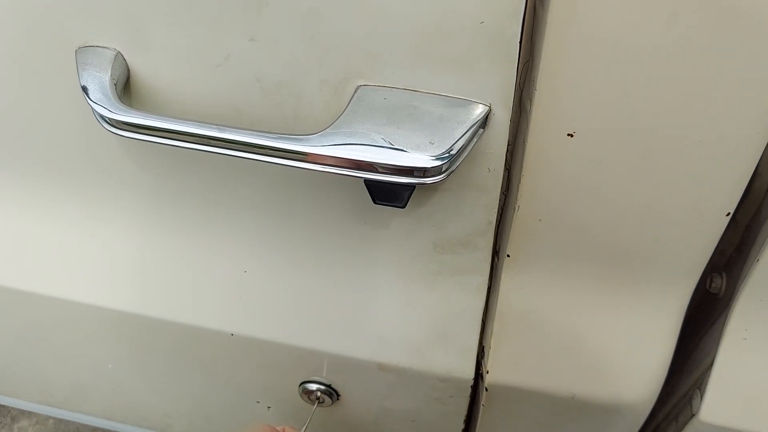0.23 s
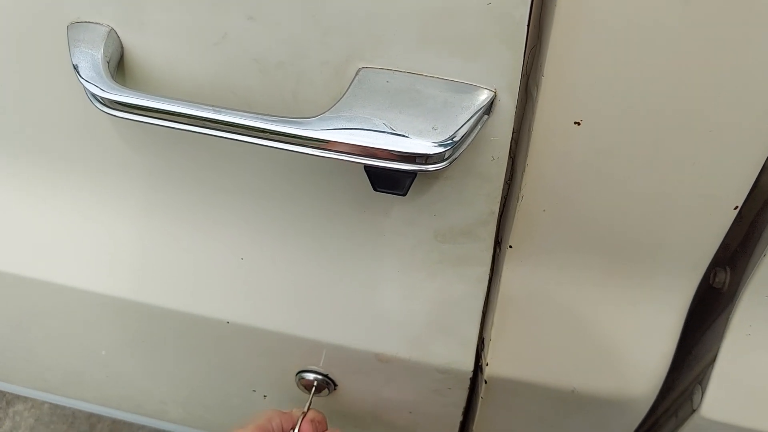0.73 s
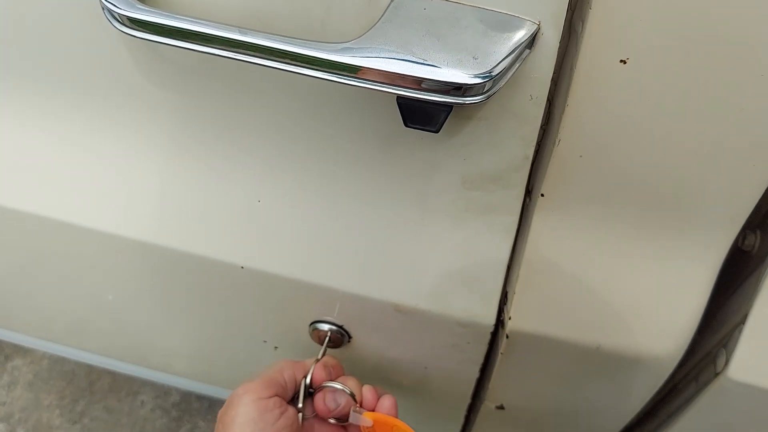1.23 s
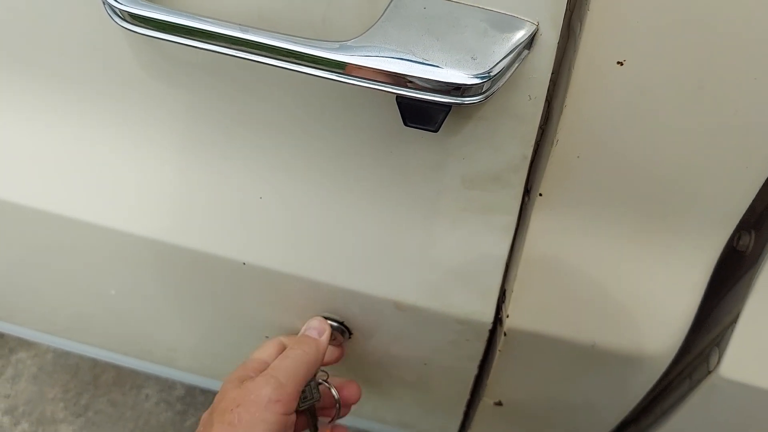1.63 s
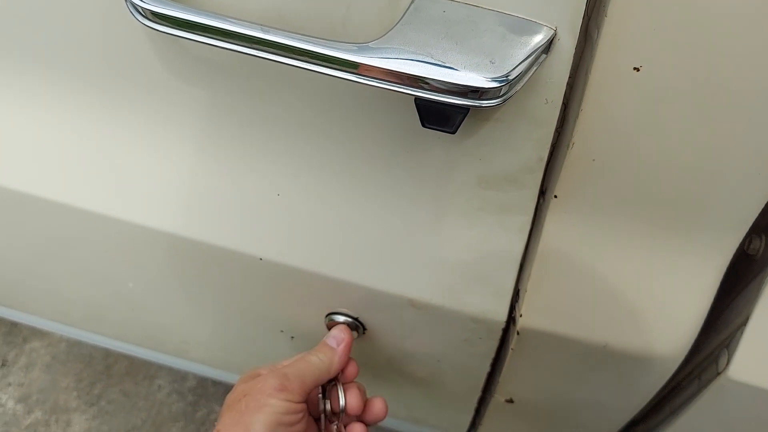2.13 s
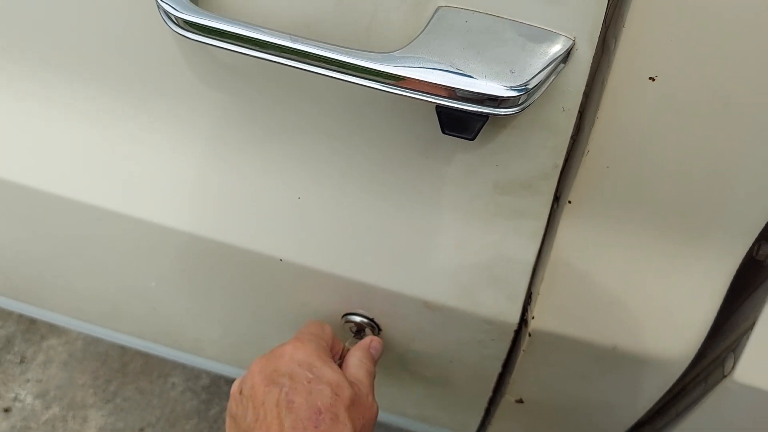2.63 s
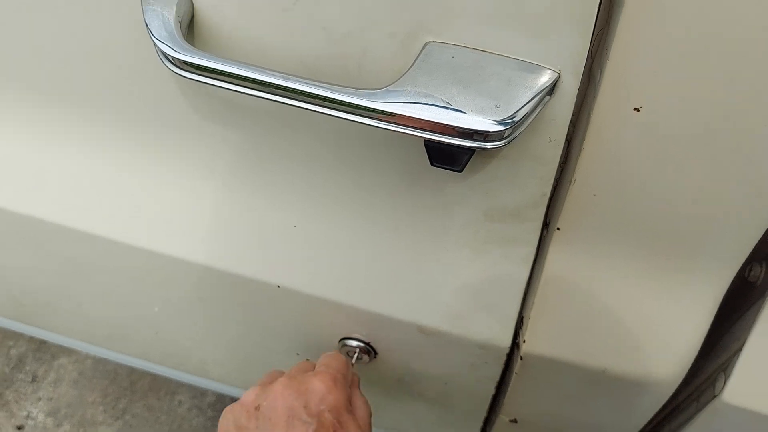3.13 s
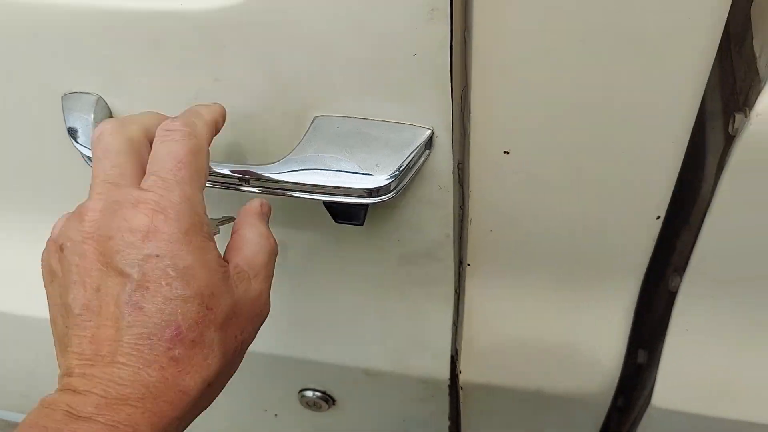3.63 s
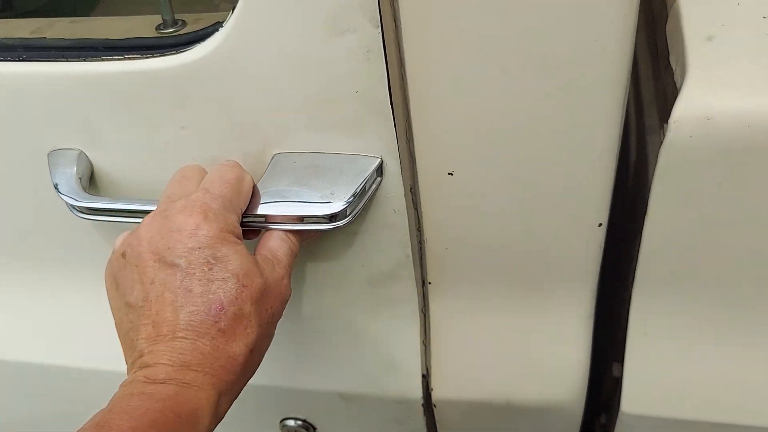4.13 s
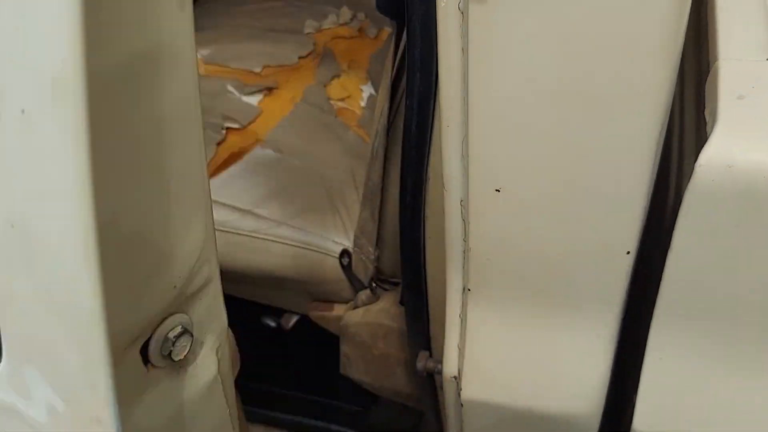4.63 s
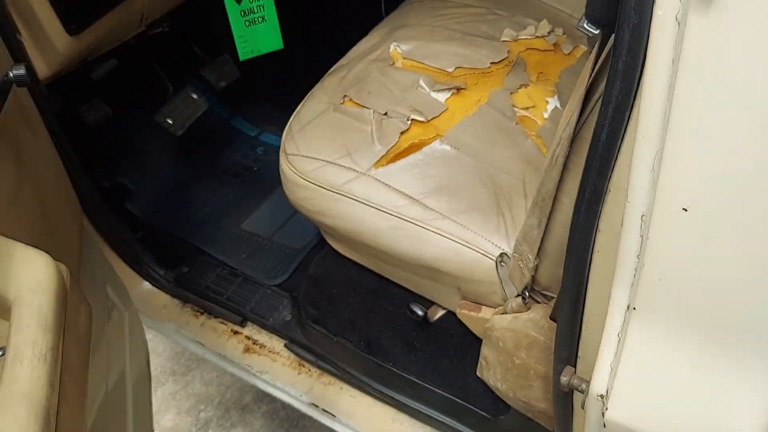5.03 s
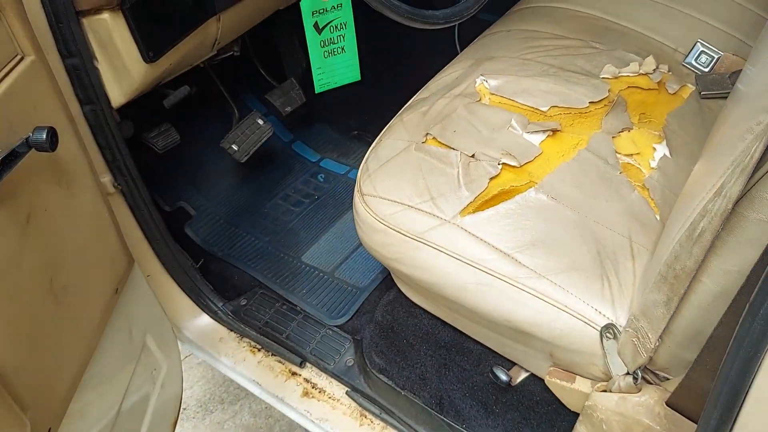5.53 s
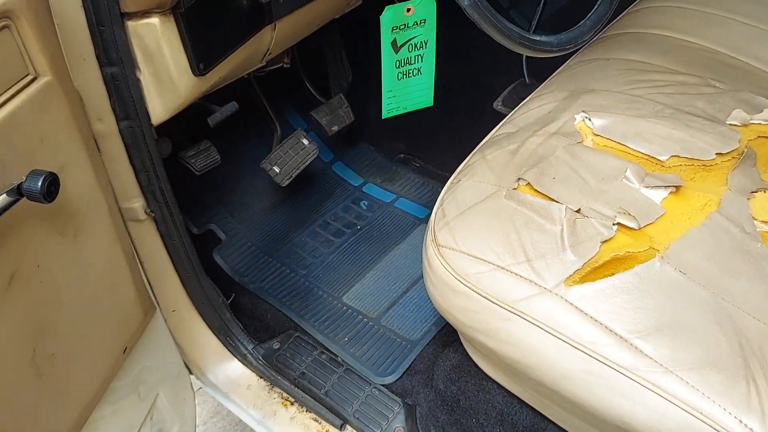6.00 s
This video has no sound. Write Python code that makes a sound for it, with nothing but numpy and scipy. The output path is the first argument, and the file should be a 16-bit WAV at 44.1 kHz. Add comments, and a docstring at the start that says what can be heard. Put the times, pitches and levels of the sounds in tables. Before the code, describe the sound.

Close outdoors, a key rasps and clacks in a vehicle's door lock, slides out, and the button and latch squeak and rattle as the door opens.

```python
"""Outdoors, close to an old truck's steel door: a key finds the lock, slides over the pins, turns, throws the bolt
and is pulled out; the key bunch clinks, the handle button squeaks in, the latch lets go, the door swings open.
Blows and sliding excite the hollow door's modes; keys, lock and latch ring in modes of their own.
Damped knocks and low puffs of air on the microphone are short tones with noise, squeaks are gliding
stick-slip tones, and shaped noise makes the faint background."""
import sys
import numpy as np
from scipy import signal
from scipy.fft import rfft, irfft, next_fast_len
from scipy.io import wavfile
from scipy.ndimage import map_coordinates

SR = 44100
rng = np.random.default_rng(int(sys.argv[2]) if len(sys.argv) > 2 else 0)


def store_wav(level_fs):
    """Save 16-bit WAV to argv[1]."""
    pcm = np.round(np.clip(np.atleast_2d(level_fs), -1, 1) * 32767)
    wavfile.write(sys.argv[1], SR, pcm.T.astype(np.int16))


N = 276242  # length in samples
T = np.arange(SR // 2) / SR  # time axis of one event (s)
KEY_OUT_S, DOOR_OPEN_S = 3.35, 4.8
FLEX_CUT_HZ, FLEX_HZ, BOOM_HZ, TICK_HZ = 135, 250, 800, 5000  # edges of the door's registers


def amp(db):
    """Logarithmic level: decibels to amplitude gain."""
    return 10 ** (np.asarray(db) / 20)


def unit(x):
    """Power normalisation: scale to rms 1."""
    return x / np.sqrt(np.mean(x ** 2) + 1e-20)


def struck(x, size=1400):
    """Onset normalisation: scale a decaying sound to rms 1 over its first samples."""
    return x / np.sqrt(np.mean(x[..., :size] ** 2) + 1e-20)


def along(points, hz):
    """Logarithmic frequency scale: interpolate (f, value) points along it."""
    f, v = np.transpose(points)
    return np.interp(np.log(hz + 1), np.log(f + 1), v)


def fade(t60):
    """Exponential damping: a fall of 60 dB in t60 seconds."""
    return np.exp(-np.log(1000) * T / t60)


def build(rise_s):
    """Exponential build-up of a driven response, with time constant rise_s."""
    return 1 - np.exp(-T / rise_s)


def panned(x, pan_db):
    """Interaural level difference: lean a sound to the left by pan_db."""
    return x * amp([[pan_db / 2], [-pan_db / 2]])


def add(track, s, x):
    """Superposition: mix x into the track at s seconds."""
    part = track[:, max(round(s * SR), 0):][:, :x.shape[-1]]
    part += x[..., :part.shape[1]]


def band(x, hz, kind, order=3):
    """Causal Butterworth filtering."""
    edges = np.clip(hz, 10, SR / 2 - 100)
    return signal.sosfilt(signal.butter(order, edges, kind, fs=SR, output="sos"), x)


# Interaural coherence of noise and modes: f/Hz, left-right likeness (0-1)
ALIKE = [(50, 0.57), (130, 0.96), (300, 0.95), (640, 0.7), (1400, 0.084), (3100, 0), (7000, 0)]


def half_angle(hz):
    """Interaural coherence as an angle: the cosine of twice this angle is the left-right likeness."""
    return np.arccos(np.clip(along(ALIKE, hz), -1, 1)) / 2


def noise(spectrum, size):
    """Spectral shaping of random noise; mid and side are weighted for the coherence at each frequency."""
    m = next_fast_len(size)
    hz = np.fft.rfftfreq(m, 1 / SR)
    turn = half_angle(hz)
    shape = amp(along(spectrum, hz)) * [np.cos(turn), np.sin(turn)]
    mid, side = irfft(rfft(rng.standard_normal((2, m))) * shape, m)[:, :size]
    return unit(np.array([mid + side, mid - side]))


def ring(modes, scatter_db):
    """Modal superposition: decaying sines at new strengths, with phase split between the ears by coherence."""
    out = np.zeros((2, len(T)))
    for hz, db, t60 in modes:
        size, phase = amp(db + scatter_db * rng.normal()), rng.uniform(0, 2 * np.pi)
        split = rng.choice([-1, 1]) * half_angle(hz)
        angle = (2 * np.pi * hz * T + phase + np.array([[split], [-split]])).astype(np.float32)
        out += size * fade(t60) * np.sin(angle)
    return out


def wobble(rate):
    """Random modulation: a smooth curve through rate random knots a second."""
    knots = rng.standard_normal(int(N * rate / SR) + 4)
    return map_coordinates(knots, [np.arange(N) * rate / SR])


def registers(x):
    """Band decomposition into deep flex, low boom, middle clack and high shimmer of the door."""
    flex, boom = band(x, FLEX_HZ, "low", order=5), band(x, [FLEX_HZ, BOOM_HZ], "band", order=5)
    return flex, boom, band(x, [BOOM_HZ, TICK_HZ], "band"), band(x, TICK_HZ, "high")


# The door's strong panel modes, with the latch's ring near 381 Hz sounding along: f/Hz, relative level/dB,
# t60/s
PANEL = [(132.3, -3.5, 0.68), (149.3, 6, 0.28), (190.6, 2, 0.74), (248, -4, 0.24), (260.8, -0.5, 0.4),
         (286, 2, 0.11), (315.3, 0, 0.42), (352.2, -4.5, 0.55), (381, -3, 0.44), (423.7, 6, 0.18),
         (453.7, 5, 0.3), (484.8, 2.5, 0.33), (505.6, 3, 0.37), (544, 2, 0.33), (563.7, 6, 0.24),
         (591.6, 0.5, 0.49), (629.5, 1, 0.42), (689, 0.5, 0.27), (735, 0.5, 0.33), (1026, -10, 0.25),
         (1244, -0.5, 0.27), (1383, 3, 0.23), (1502, 2.5, 0.19), (1653, -5, 0.14), (1770, -2, 0.17),
         (1904, -10, 0.38), (2030, -7, 0.15), (2150, -5.5, 0.22), (2317, -2.5, 0.15), (2560, -8, 0.14),
         (2766, -5, 0.16)]
# Its dense weak modes: f/Hz, relative level/dB
SHELL = [(60, -25), (95, 0), (135, 3.5), (300, -5), (520, 1.5), (730, -4), (900, -6.5), (1300, -5),
         (1800, -4), (2600, -8.5), (4500, -8.5), (6200, -19), (10000, -24.5), (15000, -22.5)]
# Damping of the dense modes: f/Hz, t60/s
SHELL_DECAY = [(100, 0.22), (600, 0.58), (1800, 0.26), (4800, 0.12), (12000, 0.1)]


def door(modes_db=2):
    """Modal density: the hollow door's impulse response has strong panel modes among many weak ones."""
    hz, t, z = signal.stft(noise(SHELL, len(T)), SR, nperseg=256)
    decay = np.exp(-np.log(1000) * t / along(SHELL_DECAY, hz)[:, None])
    dense = signal.istft(z * decay, SR, nperseg=256)[1][:, :len(T)]
    return struck(dense) + amp(modes_db) * struck(ring(PANEL, scatter_db=4.5))


# Colour of the outdoor background: f/Hz, relative spectral density/dB per Hz
AIR = [(20, -40), (37, -15), (59, -4), (114, -10), (166, -20.5), (420, -15), (560, -16), (700, -22.5),
       (988, -27), (1350, -23.5), (1530, -19), (1800, -22), (2410, -26.5), (4250, -30), (16000, -42.5)]
# Its common rise and fall, before the rumble's boost: t/s, level/dB
AIR_LEVEL = [(0.0, -62.5), (0.45, -57), (1.1, -58.5), (2.698, -57), (3.75, -63), (4.3, -51), (4.9, -57),
             (5.85, -60), (6.26, -61.5)]


def outdoors(rumble_db=6.0):
    """Amplitude-modulated broadband noise: far rumble and thin hiss of open air rise and fall together."""
    level = amp(np.interp(np.arange(N) / SR, *np.transpose(AIR_LEVEL)))
    air = noise(AIR, N)
    rumble, hiss = band(air, 1040, "low"), band(air, 770, "high")
    return level * (panned(amp(rumble_db) * unit(rumble), 2.0) + unit(hiss))


# Knocks on small damped parts: t/s, level/dB, f/Hz, t60/s, noise over tone/dB
TAPS = [(0.1251, -40, 630, 0.054, -18), (0.141, -40.5, 559, 0.2, -7), (0.204, -35.5, 302, 0.22, -6),
        (1.721, -39, 2380, 0.014, 18), (1.797, -37.5, 579, 0.14, -8), (1.243, -36.5, 696, 0.091, -10),
        (1.411, -34.5, 333, 0.091, -8), (1.436, -39, 480, .08, -6), (1.473, -43, 697, 0.051, -13),
        (1.496, -45.5, 383, .08, -9), (1.526, -43, 324, .09, -3), (1.753, -39, 707, .08, -2),
        (1.818, -40.5, 517, 0.081, -9), (2.926, -28.5, 184.7, 0.21, -4.5), (2.957, -29.5, 496, 0.12, -13),
        (3.018, -36, 489, 0.069, -15), (4.352, -40, 511, 0.05, -6), (2.301, -32, 1250, 0.022, 4),
        (2.911, -22, 1740, 0.02, 10), (3.827, -43.5, 2570, 0.01, 14), (3.868, -59.5, 3800, 0.0087, 8),
        (4.0927, -46, 11960, 0.031, 2), (4.431, -38, 375.5, 0.12, -19), (4.688, -36.5, 480, 0.027, -4),
        (4.6952, -39.5, 4050, 0.0064, 3.5), (4.949, -57, 318.8, 0.11, 2), (5.018, -36, 466, 0.12, -6.5),
        (5.176, -43, 348, 0.15, -10), (5.178, -45, 524, 0.084, -9), (6.107, -48, 310, 0.12, -1.5),
        (6.197, -71, 1100, 0.046, 5), (6.212, -58, 1080, 0.055, 14)]


def taps(edge_db=-21):
    """Heavily damped resonance: a few cycles of one pitch, clean or noisy, under a tiny bright edge."""
    out = np.zeros((2, N))
    for s, db, hz, t60, noisy_db in TAPS:
        colour = [(hz / 4, -40), (hz / 2, -14), (hz / np.sqrt(2), -2), (hz * 1.22, -2), (hz * 2, -18), (hz * 4, -32)]
        tap = unit(np.sin(2 * np.pi * hz * T)) + amp(noisy_db) * noise(colour, len(T))
        body = struck(tap * fade(t60) * build(0.0034))
        edge = band(rng.standard_normal((2, len(T))) * fade(0.0042), [hz, hz * 3], "band", order=2)
        add(out, s, amp(db) * panned(body + amp(edge_db) * struck(edge), 0.47))
    return out


# Bare metal contact: f/Hz, relative level/dB
CRACK = [(200, -20), (900, 9), (1800, 9.5), (3500, -0.5), (6000, -14.5), (10000, -19.5), (15000, -14.5)]
# Blows that ring the door: t/s, boom level/dB, hardness (clack over boom)/dB, edge (tick over boom)/dB.
# The key tip finds the slot, goes in, seats and turns; the linkage takes up, the bolt is thrown;
# the key comes out, the button is pressed, the latch lets go, the hinges take the weight.
# Clack and tick levels come before their fixed trims.
BLOWS = [(0.1255, -44, -7.5, -4.5), (0.1825, -45, -7, 5), (0.652, -48, 2.5, 6.5),
         (1.1975, -34.5, -5.5, -12), (1.2135, -38.5, 3.5, -2.5), (1.364, -35, -4, -15),
         (1.3825, -32.5, -2.5, -10), (1.427, -43.5, -11, -1.5), (1.6045, -39, -8, -15),
         (1.9705, -39, 3.5, 3.5), (2.094, -43, -4, -20), (2.2795, -41, 4.5, -7), (2.301, -34.5, 0, -33),
         (2.726, -45.5, -6, -26), (2.7485, -35.5, 9.5, -4), (2.9065, -29, 5, -7), (2.911, -25.5, 7, 0),
         (3.1205, -44.5, 4.5, -1.5), (3.1645, -45, 8, 6.5), (3.283, -39, 6.5, -1), (3.29, -42, 8.5, 4),
         (3.31, -40, -9, -6), (4.0125, -42.5, 5, -12), (4.04, -39.5, 7.5, -2.5), (4.086, -37.5, 4.5, -11),
         (4.4135, -35.5, 4.5, -5), (4.4245, -39, 10.5, 6.5), (4.433, -47, 5.5, 1), (4.518, -35.5, 6, -20),
         (5.0185, -43, -1, -31), (5.176, -39, -8.5, -33), (5.471, -59.5, 10.5, 2.5)]
# Light ticks of pins and springs with a faint ring of the door: t/s, tick level/dB before its trim
TICKS = [(0.133, -61), (0.25, -47.5), (0.51, -58), (0.634, -49), (0.812, -57.5), (1.349, -51), (1.356, -47),
         (1.95, -42), (3.099, -55.5), (3.154, -59), (4.118, -43), (4.576, -51), (4.623, -57), (4.743, -63),
         (5.059, -54), (5.228, -57), (5.243, -51.5), (5.36, -53.5), (5.388, -54), (6.135, -53),
         (6.177, -58.5), (6.197, -51)]
TICK_EDGE_DB = 4  # a light tick's level over the door's boom, before trim
FLEX_DB, FLEX_PER_HARDNESS = -14.5, 0.11  # deep flex under the boom, a little more for hard blows
CRACK_DB, CRACK_PER_HARDNESS = -8, 0.12  # bare crack under the clack; hard blows crack more


def contacts(crack_t60=0.012, tick_t60=0.014, flex_rise_s=0.0025, boom_rise_s=0.0013,
             shimmer_db=-6, shimmer_rise_s=0.0022, open_hz=540, count=8):
    """Impact excitation: a short crack, then boom and flex build as the blow spreads through sheet steel."""
    out = np.zeros((2, N))
    answers = [registers(door()) for _ in range(count)]  # used in turn
    light = [(s, db - TICK_EDGE_DB, 0, TICK_EDGE_DB) for s, db in TICKS]
    size = len(T) // 10
    for k, (s, boom_db, hardness_db, edge_db) in enumerate(BLOWS + light):
        clack_db, tick_db = boom_db + hardness_db, boom_db + edge_db
        flex_db = boom_db + FLEX_DB + FLEX_PER_HARDNESS * hardness_db
        crack_db = clack_db + CRACK_DB + CRACK_PER_HARDNESS * hardness_db
        flex, boom, clack, shimmer = answers[k % count]
        if s > DOOR_OPEN_S:
            boom = band(boom, open_hz, "low", order=6)  # shaken only through its hinges, more dully

        bare = noise(CRACK, size) * build(0.003)[:size]
        crack = band(bare * fade(crack_t60)[:size], [BOOM_HZ, TICK_HZ], "band")
        tick = band(bare * fade(tick_t60)[:size], TICK_HZ, "high")
        add(out, s, panned(amp(crack_db) * struck(crack), -5.5) + amp(tick_db - 4) * struck(tick))

        body = amp(flex_db) * struck(band(flex, FLEX_CUT_HZ, "high") * build(flex_rise_s))
        body += panned(amp(boom_db) * struck(boom * build(boom_rise_s)), -1.0)
        body += panned(amp(clack_db - 4.0) * struck(clack * build(0.0022)), -5.0)
        body += amp(tick_db + shimmer_db) * struck(shimmer * build(shimmer_rise_s))
        add(out, s, body)
    return out


def slips(rate, spread_db):
    """Poisson-like excitation: random tiny slips of uneven size; the denser, the smaller."""
    happens = rng.random(N) < rate / SR
    unevenness = amp(spread_db * np.minimum(rng.exponential(size=N), 2))
    return happens * rng.standard_normal(N) * unevenness / np.sqrt(rate)


# Strokes of metal sliding on metal: start t/s, push t/s, release t/s, boom level/dB,
# flex over boom/dB, rasp over boom/dB, grit over boom/dB.
# A few strokes are already dying away at their push.
# The key feels for the slot, enters, rides over the pins, seats and turns, turns on and back, is drawn out;
# button and handle move, the door leaves its seal, the hinges turn.
STROKES = [(0.16, 0.228, 0.31, -37.5, -0.5, -11.5, -23), (0.32, 0.402, 0.49, -48, -19, -7, -5.5),
           (0.65, 0.694, 0.77, -40.5, 2.5, -4, -19), (1.115, 1.12, 1.16, -49.5, -6, -12, -16),
           (1.227, 1.253, 1.306, -34, -2.5, -13, -32), (1.299, 1.33, 1.58, -41.5, 0, -6.5, -13),
           (1.375, 1.4, 1.45, -37.5, 0.5, -8, -16), (1.62, 1.722, 1.85, -36.5, -4.5, -8.5, -13.5),
           (1.754, 1.79, 1.93, -42.5, -5, -17, -16), (1.962, 1.98, 2.06, -41.5, 5, -3, -15),
           (2.267, 2.298, 2.294, -42.5, 1, -1, -16), (2.76, 2.817, 3.01, -35.5, -1.5, -8.5, -17),
           (2.924, 2.958, 2.98, -28, -4.5, -13, -24), (3.023, 3.055, 3.2, -41, -4, -7, -25),
           (3.142, 3.287, 3.356, -38, 4.5, -10.5, -13.5), (3.294, 3.31, 3.47, -44, 3, -23, -28),
           (3.902, 3.949, 3.99, -55, -9, 8, -6), (4.002, 4.02, 4.19, -39.5, -10, 6, -10),
           (4.114, 4.167, 4.2, -43, -9, -3, -6), (4.223, 4.286, 4.56, -40.5, -3, -3, -13.5),
           (4.534, 4.55, 4.4, -32, -17, 6, -2), (4.642, 4.705, 4.77, -39, 0, -7, -19),
           (5.19, 5.228, 5.47, -53, 5, -5, -8), (5.475, 5.483, 5.54, -59, -10, 9.5, -10),
           (6.007, 6.134, 6.18, -58.5, 10, -7, -13)]
SWELL_DB, EASE_DB = 5.5, 6.5  # force at the start and at the release, below the push
STROKE_ATTACK_S = 0.048


def stroke_gain(levels_db, t60):
    """Force envelope: a quick attack, a level shaped by start, push and release times, and a decay from release."""
    time = np.arange(0, N, 32) / SR
    power = np.zeros(len(time))
    for (start, push, release, *_), level_db in zip(STROKES, levels_db):
        shape_db = np.interp(time, [start, push, release], [-SWELL_DB, 0, -EASE_DB])
        attack = np.clip((time - start) / STROKE_ATTACK_S + .5, 0, 1)
        decay = np.exp(-np.log(1000) * np.maximum(time - release, 0) / t60)
        power += (attack * decay * amp(level_db + shape_db)) ** 2
    return np.interp(np.arange(N) / SR, time, np.sqrt(power))


# Colour of rubbed steel, rising to its main ring near 1.5 kHz: f/Hz, relative level/dB
RASP = [(700, 0), (950, 4.5), (1200, 7), (1560, 9.5), (2100, 2.5), (3200, -1), (5000, 0.5)]
# Decay of the stroke envelope for flex, boom, rasp and grit in turn: t60/s
SLIDE_T60 = [0.72, 0.4, 0.22, 0.19]
KEY_SLIPS_PER_S, HANDLE_SLIPS_PER_S, SLIP_SPREAD_DB, RASP_T60 = 330, 900, 1.9, 0.13


def sliding(jerk_db=2.0, boom_jerk_db=2.0, grit_t60=0.026):
    """Friction as convolution: jerky slips drive the door's flex, boom and rasp under a finer, denser grit."""
    # the key catches in separate grains, the handle grinds
    rate = np.where(np.arange(N) / SR < KEY_OUT_S, KEY_SLIPS_PER_S, HANDLE_SLIPS_PER_S)
    coarse = slips(rate=rate, spread_db=SLIP_SPREAD_DB)[None]
    fine = slips(rate=1800, spread_db=-3.0)[None]
    jerks = wobble(55)

    flex, boom, clack, _ = registers(door(modes_db=-1.5))
    rasp_colour = amp(along(RASP, np.fft.rfftfreq(len(T), 1 / SR)))
    rasp = irfft(rfft(clack * fade(RASP_T60)) * rasp_colour)[:, :len(T) // 4]
    grit = band(noise(CRACK, len(T)) * fade(grit_t60), TICK_HZ, "high")

    boom_db, flex_db, rasp_db, grit_db = np.transpose(STROKES)[3:]
    levels_db = boom_db + flex_db, boom_db, boom_db + rasp_db, boom_db + grit_db
    drives, responses = (coarse, coarse, coarse, fine), (flex, boom, rasp, grit)
    layers = []
    for db, t60, drive, response in zip(levels_db, SLIDE_T60, drives, responses):
        driven = signal.fftconvolve(drive, response, axes=1)[:, :N]
        layers.append(stroke_gain(db, t60) * unit(driven))
    flex, boom, rasp, grit = layers
    return flex + amp(boom_jerk_db * jerks) * boom + amp(jerk_db * jerks) * (panned(rasp, -7.5) + grit)


# Dry steel squeaks and groans of key, panel, button, latch and hinge: t/s, length/s, f/Hz,
# level/dB before pressure flutter, overtones/dB, roughness (0-1.1), glide as a share of the pitch
SQUEAKS = [(0.183, 0.03, 2490, -51, -21, 0.5, 0.041), (0.204, 0.046, 2990, -61, -32, 0.3, 0.0099),
           (0.306, 0.14, 3390, -60.5, -32, 0.8, 0.075), (1.312, 0.061, 151, -31, -27, 0, -0.02),
           (4.096, .022, 4120, -45, -25, 0.4, 0), (4.1277, 0.016, 4500, -38, 12.5, 0.05, 0.031),
           (4.138, 0.011, 4560, -33, -2, 0.82, 0), (4.144, .005, 4610, -26, -21, 0.4, -0.013),
           (4.158, 0.024, 1256, -32, -8.5, 0.2, 0.043), (4.159, .008, 4500, -32, -20, 1, 0),
           (4.167, 0.014, 4600, -34, -2, 0.15, 0.029), (4.183, .012, 4610, -37.5, -16, 0, 0),
           (4.52, 0.026, 4390, -34, -30, 0.52, 0.0014), (4.548, 0.019, 4550, -42.5, -10, 0.8, -0.051),
           (4.639, 0.039, 1965, -51, -32, 0.25, .02), (4.663, 0.027, 2350, -48.5, -6.5, 0.5, .03),
           (5.474, 0.033, 2220, -52, -9, 0.1, .02), (5.479, 0.025, 1870, -52, -20, 0.6, -0.00082),
           (5.658, 0.071, 1380, -57.5, -17, 0.56, -.16), (5.733, 0.067, 1247, -61, -10, 1.1, -0.16),
           (6.206, .026, 3350, -59, -17, 0.8, 0.058), (6.237, 0.042, 3270, -54, -18, 1.1, 0.16)]
HALF_TONES_DB, FLUTTER_DB = -13, 6


def squeaks(t60=0.12, rise_s=0.0021, rough_db=2.0, jitter_rad=1.43, jitter_hz=260, third_db=-6, scrape_db=-6):
    """Stick-slip oscillation: one steel mode with fluttering overtones, which rings on when the slip ends."""
    out = np.zeros((2, N))
    for s, length, hz, db, overtones_db, rough, glide in SQUEAKS:
        jitter, pressure, *flutter = (unit(band(rng.standard_normal(len(T)), jitter_hz, "low", order=2))
                                      for _ in range(4))
        progress = np.minimum(T / length, 1)
        ear_phase = np.array([[0], [np.pi / 5]])
        pitch = hz * (1 + glide * (progress - .5))
        phase = 2 * np.pi * np.cumsum(pitch) / SR + jitter_rad * rough * jitter + ear_phase
        driven = np.minimum(T / rise_s, 1) / (1 + np.exp(np.clip((T - length) / 0.0022, -50, 50)))

        second, third = (amp(FLUTTER_DB * rough * f) * np.sin(k * phase) for k, f in zip((2, 3), flutter))
        tone = np.sin(phase) + amp(overtones_db) * (second + amp(third_db) * third)
        # rough slips alternate, giving half-order tones, and scrape
        halves = rough * amp(HALF_TONES_DB + overtones_db) * sum(np.sin(k * phase) for k in (1.5, 2.5, 3.5))
        hiss = unit(band(rng.standard_normal((2, len(T))), [hz / 2, hz * 3.5], "band", order=2))
        scrape = np.sqrt(rough) * tone.std() * hiss
        voice = (driven + 0.66 * progress * fade(t60)) * tone + driven * (halves + amp(scrape_db) * scrape)
        add(out, s, amp(db + rough_db * pressure) * voice)
    return out


# Pins, rods, bolt and latch knock in their play: t/s, level/dB
RATTLES = [(1.2135, -47), (1.246, -48), (1.39, -40), (1.415, -43), (1.438, -52), (1.9693, -44),
           (2.302, -39), (2.326, -43), (2.7493, -46), (2.79, -41), (2.812, -37.5), (2.912, -32),
           (2.926, -29.5), (2.947, -32.5), (2.964, -34.5), (3.034, -50), (3.1215, -53), (3.166, -45),
           (3.289, -43), (3.311, -42), (4.016, -44), (4.046, -40), (4.088, -36.5), (4.16, -35),
           (4.272, -40), (4.292, -39), (4.318, -39.5), (4.352, -43), (4.387, -37), (4.4146, -35.5),
           (4.432, -30.5), (4.454, -46), (4.52, -40), (4.547, -41), (4.575, -46), (4.712, -46.5)]
# Modes of the lock barrel and its bolt: f/Hz, relative level/dB, t60/s
LOCK = [(508, -1, 0.29), (692, 2, 0.27), (1011, -3, 0.25), (1397, 2.5, 0.12), (1532, 1, 0.13),
        (1750, -2, 0.14), (1884, -7, 0.11), (2050, -6, 0.14), (2110, -14, 0.17), (3140, -9, 0.096),
        (4237, -22, 0.091), (4760, -10, 0.058)]
# Modes of the rods and latch: f/Hz, relative level/dB, t60/s
LATCH = [(380.5, -1, 0.3), (486, -1.5, 0.31), (536, -1, 0.37), (600, -7, 0.14), (1045, 2.5, 0.065),
         (1146, -4.5, 0.11), (1258, -2.5, 0.18), (1327, -1, 0.18), (1570, -2.5, 0.17), (1677, -5, 0.097),
         (2130, -1, 0.085)]


def rattles(rise_s=0.00064, pan_db=-4):
    """Modal excitation by impact: knocks ring the lock while the key is in, later the handle's rods and latch."""
    out = np.zeros((2, N))
    for s, db in RATTLES:
        modes = LOCK if s < KEY_OUT_S else LATCH
        knock = struck(ring(modes, scatter_db=3.5) * build(rise_s))
        add(out, s, amp(db) * panned(knock, pan_db))
    return out


# Keys touching each other: t/s, common level/dB, freedom to ring (0-1, scales t60), click/dB
CLINKS = [(1.607, -57, .15, -7), (1.62, -56, 0.4, -8.5), (1.645, -42.5, 1, -2.5), (1.712, -50, 0.6, -1),
          (1.7213, -33.5, 0.31, -7), (1.77, -59, 0.2, -3), (1.808, -54, 0.5, -12), (1.883, -54, 0.2, -0.5),
          (1.896, -52, 0.5, 2.5), (1.927, -56, .7, -8), (2.054, -61, 0.07, 4.5), (2.328, -55, 0.2, -14),
          (2.466, -53.5, .07, -11.5), (2.518, -55.5, 0.1, -11), (2.675, -60, 0.4, -7),
          (2.911, -34, 0.03, -7), (3.2, -61, .3, -9), (3.313, -45, 0.07, -6), (3.444, -60, 0.3, -10),
          (3.54, -58, 0.7, -8), (3.563, -48.5, 0.5, -6.5), (3.577, -52.5, 1, -9), (3.636, -46, 0.9, -11),
          (3.646, -46, 0.3, -8), (3.901, -59, 0.39, 2)]
# Keys hanging from the lock: f/Hz, relative level/dB, t60/s when free
HELD_KEY = [(4160, -15, 0.28), (6503, -10, 0.32), (8253, -14, 0.25), (13000, 0, 0.24), (13330, -4, 0.05),
            (15240, -11, .12)]
# Keys in the hand: f/Hz, relative level/dB, t60/s when free
FREE_KEY = [(8890, -0.5, 0.069), (11600, -4, 0.12), (12700, -0.5, 0.25), (13330, -1, 0.082),
            (14400, -12, .06)]
KEY_CLICK_T60 = 0.035


def keys(ring_db=-3, chatter_db=-9, chatter_t60=0.18):
    """Beating of near-equal modes: keys click, chatter and ring, briefly where fingers damp them."""
    out = np.zeros((2, N))
    for s, db, free, click_db in CLINKS:
        modes = np.array(HELD_KEY if s < KEY_OUT_S else FREE_KEY) * [1, 1, free]
        pair = np.vstack([modes, modes])  # two near-alike keys meet and beat
        pair[:, 0] *= 1 + .003 * rng.standard_normal(len(pair))
        tone = struck(ring(pair, scatter_db=4.5))
        chatter_noise = rng.standard_normal((2, len(T))) * fade(chatter_t60 * free)
        chatter = struck(band(chatter_noise, [12200, 15800], "band", order=2))
        click_noise = rng.standard_normal((2, len(T))) * fade(KEY_CLICK_T60)
        click = struck(band(click_noise, 3150, "high", order=2))
        add(out, s, amp(db) * (amp(ring_db) * tone + amp(chatter_db) * chatter + amp(click_db) * click))
    return out


# Low, mostly left-sided puffs of air on the microphone: t/s, level/dB before the common trim, f/Hz,
# left over right/dB before the common lean
PUFFS = [(3.999, -30.5, 80, 9), (4.263, -22, 190, -3), (4.689, -30, 125, -5), (4.727, -27, 83.5, 5),
         (4.949, -25, 134, 28.5), (4.979, -19.5, 91, 20), (5.017, -13, 73, 13), (5.049, -22.5, 67.8, 23),
         (5.121, -24.5, 119.6, 13), (5.142, -25.5, 75, 15), (5.181, -19.5, 81, -2),
         (5.237, -28.5, 114, 24.5), (5.277, -32.5, 68.6, 23), (5.7, -31.5, 118, 11), (5.911, -36.5, 69, 16),
         (6.107, -24.5, 131, -1), (6.185, -30.5, 71.5, 16)]


def puffs(level_db=-3, t60=0.089, rise_s=0.0051, rumble_db=-8):
    """Damped low-frequency oscillation: each puff of air is a few cycles with a muffled rumble."""
    out = np.zeros((2, N))
    for s, db, hz, pan in PUFFS:
        rumble = noise([(30, -4), (70, 13.0), (200, 7.0), (500, -11), (1500, -48), (5000, -76)], len(T))
        puff = np.sin(2 * np.pi * hz * T) + amp(rumble_db) * rumble
        add(out, s, amp(db + level_db) * panned(puff * fade(t60) * build(rise_s), pan + 3))
    return out


def scene():
    """Linear superposition of all the sounds at the door."""
    return outdoors() + taps() + contacts() + sliding() + squeaks() + rattles() + keys() + puffs()


def favour(x, hz, q, gain):
    """Resonance: lift the part of a sound around one frequency."""
    return x + gain * signal.lfilter(*signal.iirpeak(hz, max(q, 1), SR), x)


PORT_Q, TOP_HZ, EDGE_HZ = 24, 16100, 700  # resonance sharpness; centre and width of the low-pass edge


def record(dry, port_hz=1535, port_gain=1.0, top_ring_hz=15650, top_ring_gain=0.43, low_cut_hz=38):
    """Linear filtering: microphone colour with two resonances and a low cut, then a plain low-pass near 16 kHz."""
    coloured = favour(dry, port_hz, q=PORT_Q, gain=port_gain)
    coloured = favour(coloured, top_ring_hz, q=PORT_Q, gain=top_ring_gain)
    coloured = band(coloured, low_cut_hz, "high", order=3)
    m = next_fast_len(N + SR // 2)
    passed = np.clip((TOP_HZ - np.fft.rfftfreq(m, 1 / SR)) / EDGE_HZ + .5, 0, 1)
    return irfft(rfft(coloured, m) * passed, m)[:, :N]


dry = scene()
out = record(dry)
store_wav(out)
```